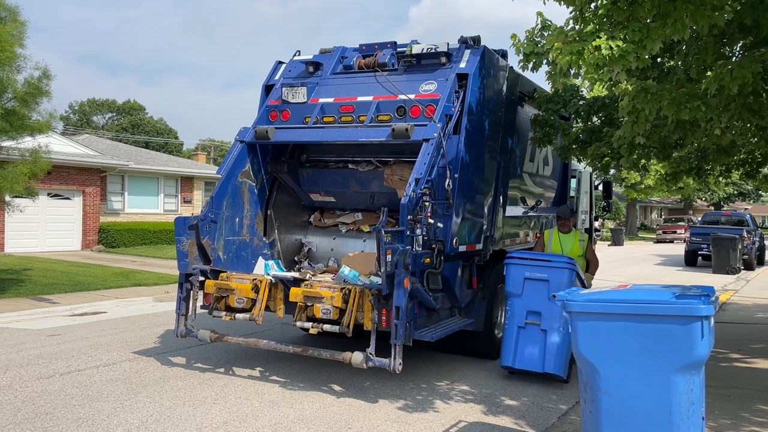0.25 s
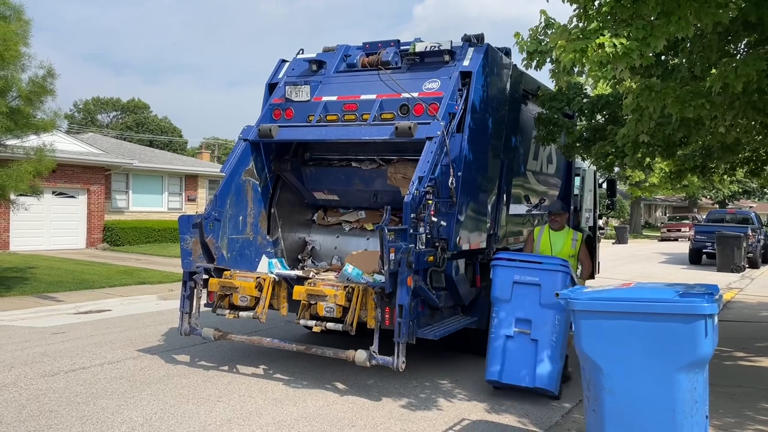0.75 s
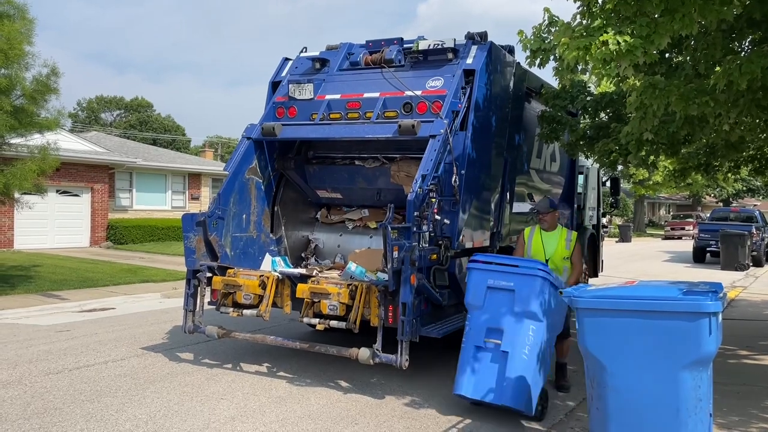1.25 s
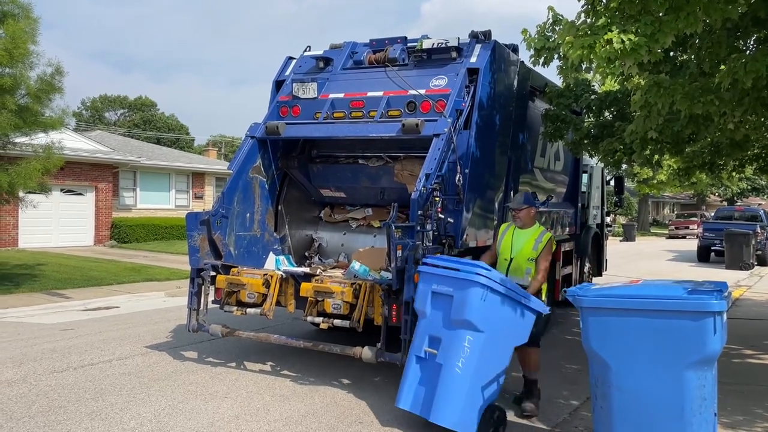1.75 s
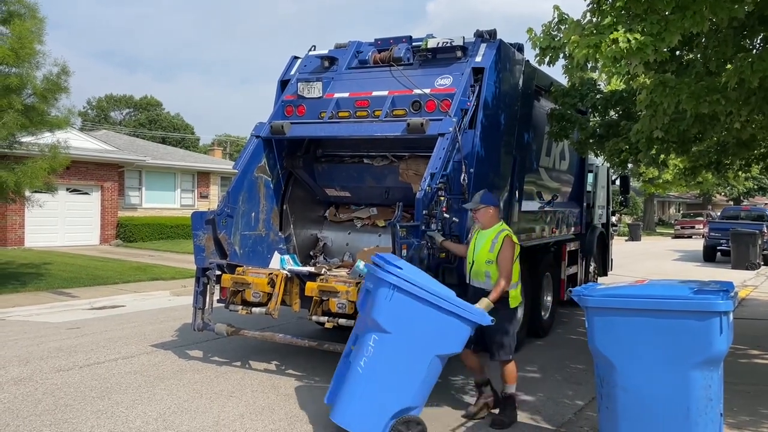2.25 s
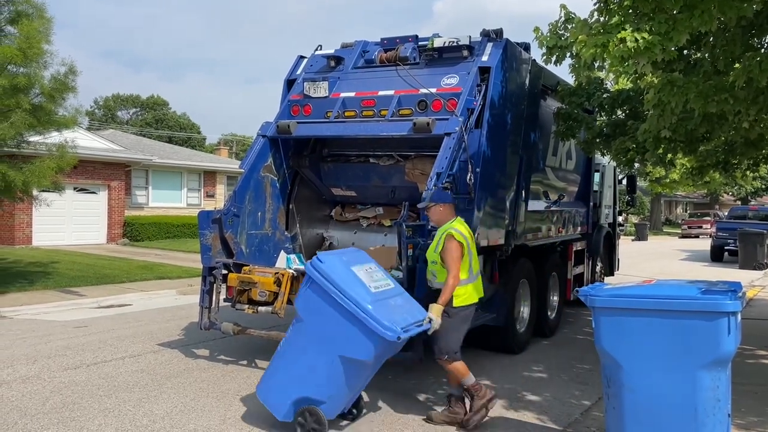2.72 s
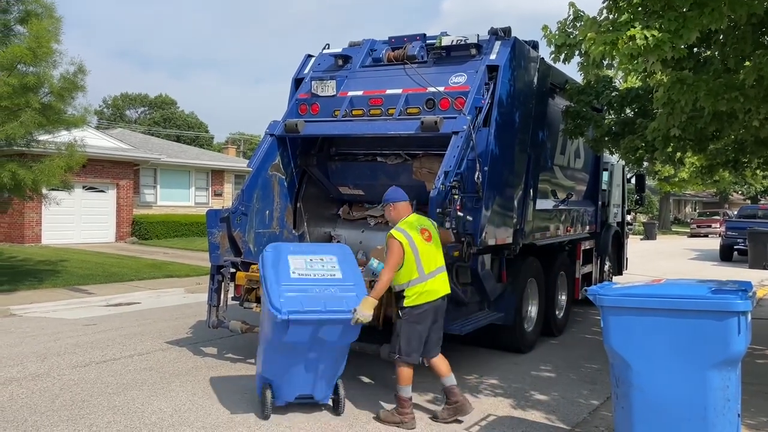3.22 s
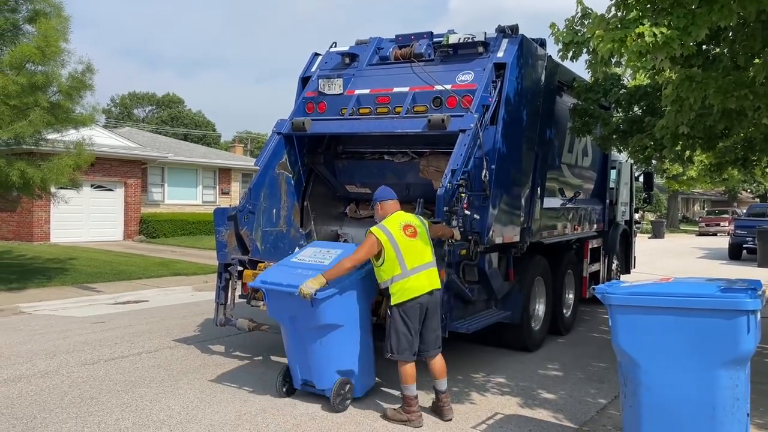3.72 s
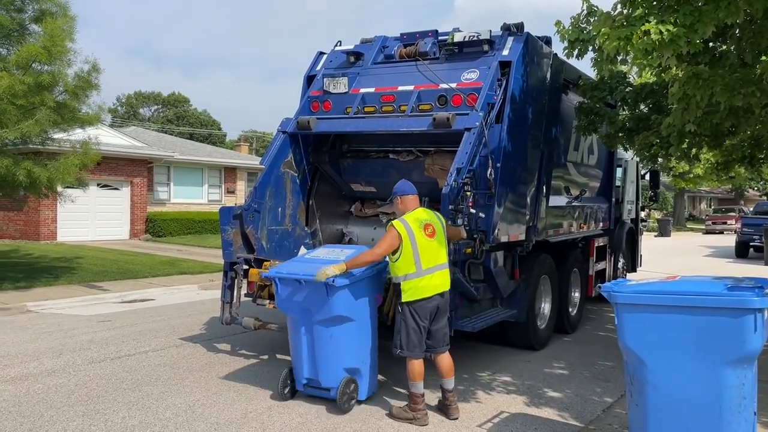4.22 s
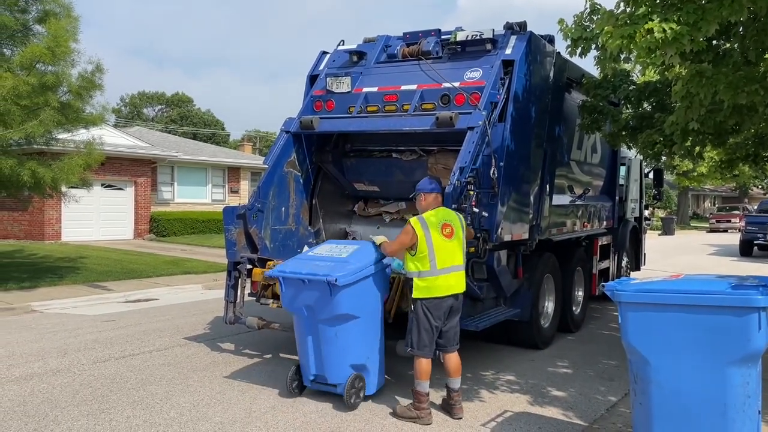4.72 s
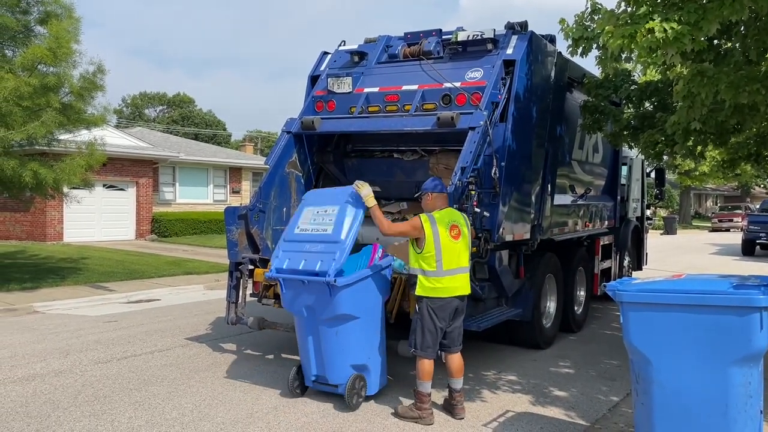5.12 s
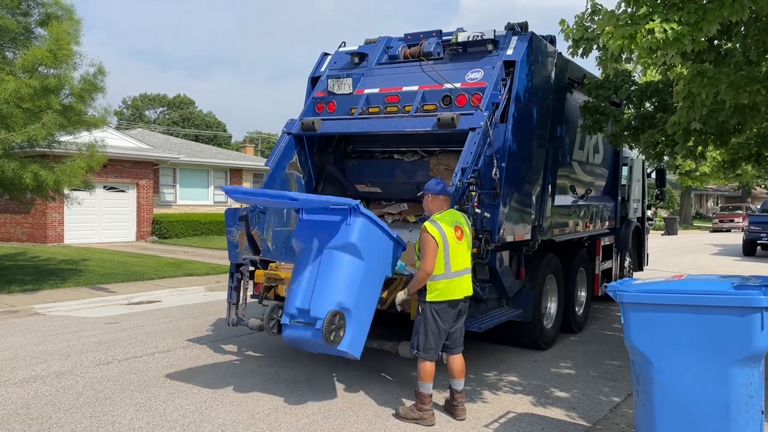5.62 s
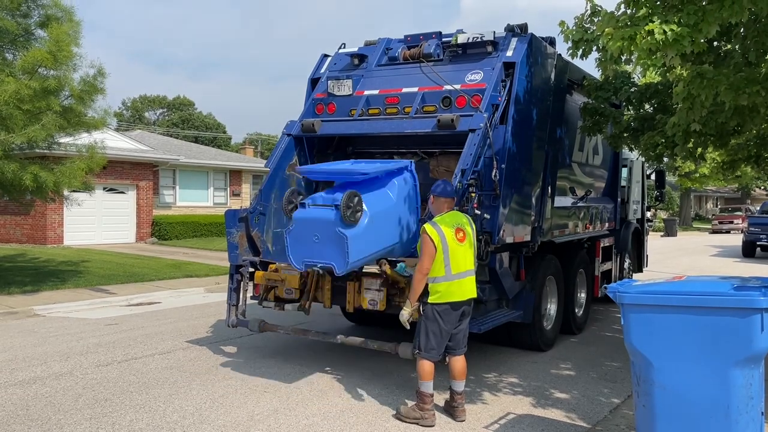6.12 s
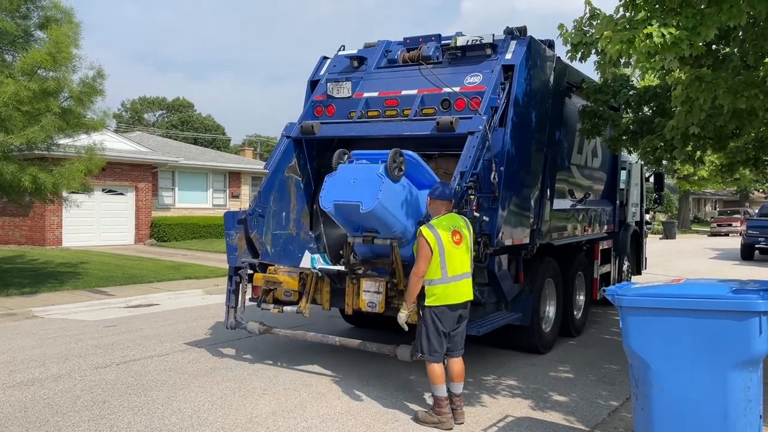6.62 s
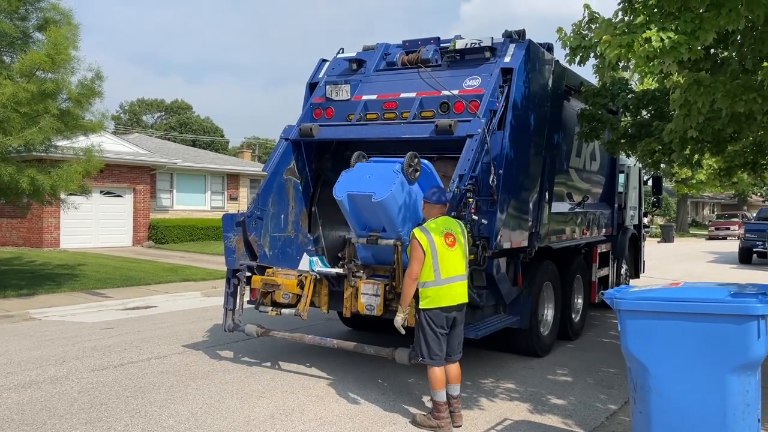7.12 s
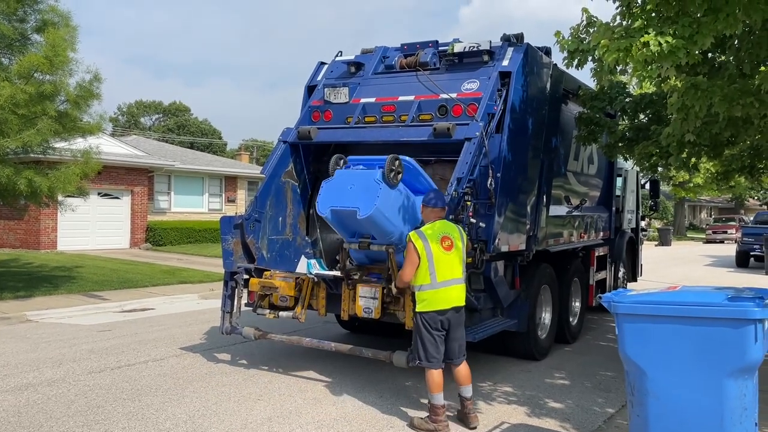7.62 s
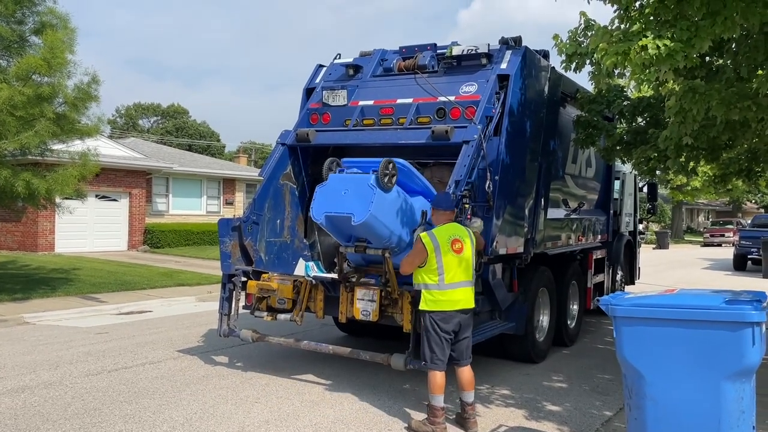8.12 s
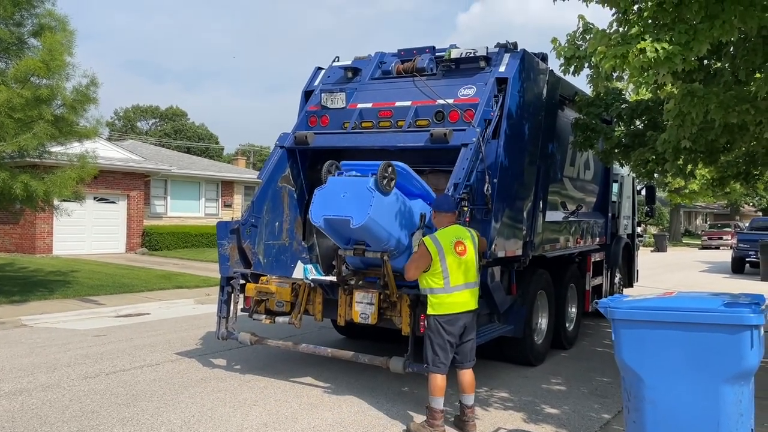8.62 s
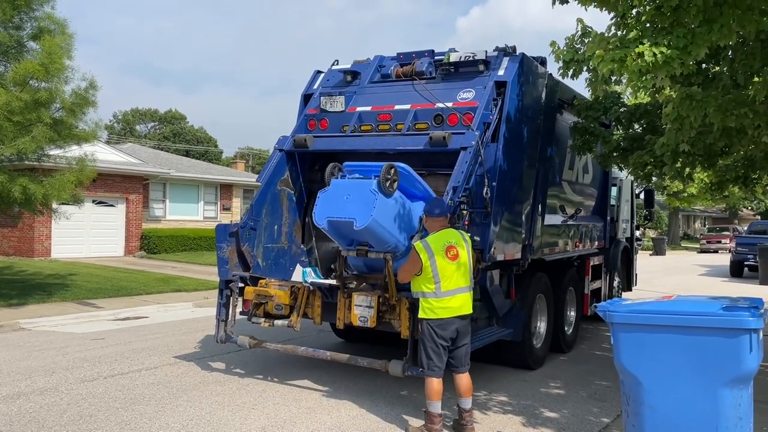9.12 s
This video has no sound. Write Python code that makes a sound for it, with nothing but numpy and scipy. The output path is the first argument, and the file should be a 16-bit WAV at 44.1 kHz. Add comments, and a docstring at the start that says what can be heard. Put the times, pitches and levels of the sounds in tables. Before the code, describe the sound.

Hollow cart bumps and latch clinks over a steady truck engine, then a hard steel bang, hissing hydraulics, tumbling rubbish and repeated shaking crashes.

```python
"""A hollow plastic cart is wheeled up to a rear-loading garbage truck, hooked on, tipped and shaken.
It bangs on the steel: noise bursts for the contacts, decaying sines for panel, cart and hopper.
Rubbish tumbles out as gritty noise, and oil hisses and whistles through the valve as shaped noise.
The diesel, a stack of sines on its firing rate, drones on and sags under the pump's load.
Noise and tiny impacts make the rumble; sparse echoes place the blows in a quiet street."""
import sys
import numpy as np
from scipy import signal
from scipy.fft import rfft, irfft, next_fast_len
from scipy.io import wavfile
from scipy.ndimage import uniform_filter1d, map_coordinates

SR = 44100
rng = np.random.default_rng(int(sys.argv[2]) if len(sys.argv) > 2 else 0)


def persist_wave(psi):
    """Save psi, clipped to +-1, as 16-bit WAV."""
    counts = np.round(np.clip(psi, -1, 1) * 32767).astype(np.int16)
    wavfile.write(sys.argv[1], SR, np.atleast_2d(counts).T)


N = 412776
TIME = np.arange(N) / SR
REV_UP_S = (3.9, 4.5)  # the engine rises to fast idle between these times

# Colour of the jarred hollow cart. Each row: frequency in Hz, relative level in dB.
BODY = [(100, -3.5), (170, -3), (250, 4), (310, 1), (370, 1.5), (460, -2), (560, -11.5), (900, -41.5)]
# Colour of rattling sheet steel and hard contacts. Each row: frequency in Hz, relative level in dB.
RATTLE = [(350, -11), (580, -9), (720, 2), (870, 5.5), (1060, 9), (1220, 1), (1370, -12.5), (1600, -1.5),
          (2000, -7.5), (3000, -13.5), (6000, -35)]
# The hollow cart's wall modes. Each row: frequency in Hz, relative level in dB, t60 in seconds.
CART = [(216, 3, 0.16), (256, -4, 0.068), (293, 3, 0.11), (344, 5.5, 0.1), (400, 5, 0.077),
        (451.6, -7, 0.18), (635, -4.5, 0.12)]


def amp(db):
    """Decibels to gain."""
    return 10 ** (np.asarray(db) / 20)


def unit(x):
    """Scales to rms 1."""
    return x / np.sqrt(np.mean(x ** 2) + 1e-20)


def read(points, hz):
    """A curve's values, interpolated on a log-frequency axis."""
    f, value = np.transpose(points)
    return np.interp(np.log(hz + 1), np.log(f + 1), value)


def colour(x, spectrum):
    """Filters x by a spectrum in dB."""
    size = next_fast_len(x.shape[-1])
    gain = amp(read(spectrum, np.fft.rfftfreq(size, 1 / SR)))
    return irfft(rfft(x, size) * gain, size)[..., :x.shape[-1]]


def brighten(x, treble_db):
    """Tilts the treble from 5 kHz up, by the full amount from 10 kHz."""
    return colour(x, [(5000, 0), (10000, treble_db)])


def wander(hz):
    """A random curve of rms 1 that heads for a new value hz times a second."""
    knots = rng.standard_normal(4000)
    return unit(map_coordinates(knots, [TIME * hz], order=1, mode="wrap"))


def held(start, end, rise, t60):
    """An envelope that rises, holds until the end and dies away."""
    attack = np.clip((TIME - start) / max(rise, .005), 0, 1)
    return attack * amp(-60 * np.maximum(TIME - end, 0) / max(t60, .02))


def add(mix, s, sound):
    """Mixes a sound in at time s."""
    part = mix[max(round(s * SR), 0):][:len(sound)]
    part += sound[:len(part)]


def wide(drive, spectrum):
    """Colours two drives: one reaches both ports alike, the other in opposite sign as the diffuse part."""
    # Each row: frequency in Hz, level of the diffuse part in dB.
    apart = [(50, -21), (250, -12), (1000, -7.5), (3000, -5), (6000, 1), (9000, -41)]
    direct, diffuse = colour(drive, spectrum)
    return unit(direct + np.array([[1], [-1]]) * colour(diffuse, apart))


def grains(per_s, spread_db):
    """Two trains of tiny impacts of very unequal size."""
    size = amp(spread_db * np.minimum(rng.exponential(1, (2, N)), 4))
    struck = rng.random((2, N)) < per_s / SR
    return unit(size * rng.standard_normal((2, N)) * struck)


def burst(spectrum, t, rise, t60, grit_db=0):
    """Coloured noise for dense resonances struck together; grit roughens it into unequal contacts."""
    grit_per_s = 317
    shape = np.minimum(t / max(rise, 1e-4), 1) * amp(-60 * np.maximum(t - rise, 0) / max(t60, .005))
    knots = rng.standard_normal(size=400)
    grit = amp(grit_db * map_coordinates(knots, [t * grit_per_s], order=1, mode="wrap"))
    sound = colour(rng.standard_normal(len(t)), spectrum) * shape * grit
    return unit(sound) * np.sqrt(np.mean(shape ** 2))


def ring(modes, t, detune):
    """Separate decaying modes, a little different in pitch for each point of impact."""
    return sum(amp(db - 60 * t / t60) * np.sin(2 * np.pi * hz * (1 + detune * rng.standard_normal()) * t)
               for hz, db, t60 in modes)


def steelwork(x, ring_db=-4, t60=0.061):
    """Passes x through the many close resonances of pipes and plates."""
    t = np.arange(SR // 8) / SR
    mode_hz = np.exp(rng.uniform(np.log(1500), np.log(15000), size=70))
    response = ring([(hz, 0, t60) for hz in mode_hz], t, detune=0)
    response = response[None] / np.linalg.norm(response)
    return x + amp(ring_db) * signal.oaconvolve(x, response, axes=1)[:, :N]


def turbulent(x):
    """Narrow patches of the spectrum swell and fade at random, so the colour keeps shifting."""
    depth_db = 2.8
    z = signal.stft(x, nperseg=1024)[2]
    patches = uniform_filter1d(rng.standard_normal(z.shape[1:]), size=5, axis=0)  # across frequency
    patches = unit(uniform_filter1d(patches, size=7, axis=1))  # along time
    return unit(signal.istft(z * amp(depth_db * patches), nperseg=1024)[1][:, :N])


def street(x):
    """Scattered reflections from the truck, the trees and the house fronts: sparse taps, one set per port."""
    # How long the echoes last. Each row: frequency in Hz, t60 in seconds.
    decay = [(60, 0.15), (500, 0.33), (2000, 0.19), (6000, 0.2), (10000, 0.062), (16000, 0.094)]
    taps = rng.standard_normal((2, SR // 2)) * (rng.random((2, SR // 2)) < .06)
    taps[:, :SR // 300] = 0  # the first reflections arrive after a short gap
    hz, t, z = signal.stft(taps, SR, nperseg=256)
    tail = signal.istft(z * amp(-60 * t / read(decay, hz)[:, None]), SR, nperseg=256)[1]
    return signal.fftconvolve(x[None], tail / np.linalg.norm(tail[0]), axes=1)[:, :N]


def sag():
    """Firings a second lost to the pump's load."""
    # Each row: start in seconds, end in seconds, firings a second lost, time to sink in seconds.
    loads = [(3.947, 4.454, 6.54, 0.33), (5.329, 5.826, 7.8, .22), (5.58, 6.662, 4.9, 0.43),
             (7.371, 7.731, 9, .3), (8.3, 9.36, 2.38, 0.31)]
    return np.max([hz * held(start, end, sink, t60=.55) for start, end, hz, sink in loads], axis=0)


def engine_speed():
    """Firings a second: the governed speed, less the sag under each load."""
    idle_hz, fast_idle_hz = 62.73, 65.95
    return np.interp(TIME, REV_UP_S, [idle_hz, fast_idle_hz]) - sag()


def diesel(clatter_db=-43, throb=0.072, lope=0.011, drone_db=-1.24):
    """Exhaust drone on multiples of the firing rate, and injector clatter that pulses in step with it."""
    # The exhaust pipe favours other multiples at each speed.
    # Each row: firings a second, then levels of the 2nd, 4th and 6th multiple in dB before the drone's trim.
    pipe = [(57.7, -34, -32, -48), (60.3, -31, -45, -43), (62.6, -31.3, -43, -38),
            (65.4, -39.5, -32.5, -45)]
    # Multiples that the pump's load brings out. Each row: multiple, level at full load in dB.
    load_tones = [(6, -37.5), (8, -45), (10, -55)]
    # Colour of the injectors. Each row: frequency in Hz, relative level in dB.
    injector_colour = [(600, -80), (1000, 0), (1350, -4.5), (1700, -1), (2600, 0), (3500, -6.5),
                       (4500, -12), (7000, -20), (10000, -26), (14000, -45), (16000, -66)]
    waver_db, waver_share, full_load_hz = 3, .005, 7.3  # level, share of the pitch, firings a second lost

    speed = engine_speed()
    dip_db = -6 * held(3.07, 3.6, rise=0.17, t60=0.77)  # the drone dips briefly
    unsteady = np.interp(TIME, REV_UP_S, [.5, 1])  # steadier at low idle
    firing = speed * (1 + waver_share * unsteady * wander(15))
    turns = np.cumsum(firing) / SR  # firings so far
    speeds, *levels = np.transpose(pipe)
    drone = 0
    for k, level in enumerate(levels):
        tone_db = np.interp(speed, speeds, level) + waver_db * unsteady * wander(13)
        drone = drone + amp(tone_db) * np.sqrt(2) * np.sin(4 * np.pi * (k + 1) * turns)

    # the load also makes the exhaust uneven
    strain = np.clip(sag() / full_load_hz, 0, 1)
    whine = sum(amp(db + waver_db * wander(9.3)) * np.sqrt(2) * np.sin(2 * np.pi * k * turns)
                for k, db in load_tones)
    uneven = 1 + .36 * strain * wander(40)
    exhaust = (amp(drone_db + dip_db) * drone + strain * whine) * uneven

    # throbs at twice the firing rate, lopes at a sixth of it
    gate = 1 + throb * np.cos(4 * np.pi * turns) + lope * np.cos(2 * np.pi * turns / 6)
    injectors = steelwork(rng.standard_normal((2, N)) * gate, ring_db=-13)
    return exhaust + amp(clatter_db) * wide(injectors, injector_colour)


def shaking():
    """Gains of boom, body and rattle: the engine's steady share plus every movement of the cart."""
    # The cart rolls, swings or spills its load. Each row: start in seconds, end in seconds,
    # rattle in dB, boom of the chassis in dB, both before the rumble's trims.
    movements = [(0.59, 1.456, -49, -29), (2.742, 3.067, -34, -36), (3.578, 4.438, -33, -32),
                 (4.588, 4.893, -38.5, -46), (5.744, 6.72, -32.5, -50), (6.754, 7.127, -29, -25),
                 (7.242, 7.64, -29, -30), (7.71, 7.947, -32, -46), (8.048, 8.305, -39, -49),
                 (8.446, 8.805, -28.5, -27), (8.906, 9.356, -30, -30)]
    idle_boom_db, idle_body_db, idle_rattle_db = -30, -37, -38  # the running engine alone
    body_over_rattle_db = 2.5
    rattle, boom = np.zeros(N), np.zeros(N)
    for start, end, rattle_db, boom_db in movements:
        shape = held(start, end, rise=0.071, t60=1)
        rattle = np.maximum(rattle, amp(rattle_db) * shape)
        boom = np.maximum(boom, amp(boom_db) * shape)
    return (np.hypot(amp(idle_boom_db), boom),
            np.hypot(amp(idle_body_db), amp(body_over_rattle_db) * rattle),
            np.hypot(amp(idle_rattle_db), rattle))


def rumble(boom_db=1.5, body_db=.5, rattle_db=-2.5, jolt_db=2.24, throb_db=2.0):
    """Many small jolts shake the chassis, the hollow cart and the sheet steel; the moving load taps coarsely."""
    # Colour of the chassis. Each row: frequency in Hz, relative level in dB.
    chassis = [(15, -47), (28, -17), (42, 3.5), (55, 6), (75, 9.5), (100, 0.5), (150, -3), (200, -8),
               (330, -52.5)]
    boom, body, rattle = shaking()
    moving = np.interp(TIME, [2.5, 3, 5.8, 6], [.2, .5, .5, .75])  # share of coarse taps
    jolts = jolt_db * moving * wander(35)
    fine = np.sqrt(1 - moving ** 2) * grains(per_s=3000, spread_db=1.5)
    coarse = moving * grains(per_s=900, spread_db=1.2)
    throbbing = boom * amp(boom_db + throb_db * wander(9))
    return (throbbing * wide(rng.standard_normal((2, N)), chassis)
            + body * amp(body_db + jolts) * wide(grains(per_s=1800, spread_db=2.0), BODY)
            + rattle * amp(rattle_db + jolts) * wide(fine + coarse, RATTLE))


def oil_flow():
    """Gain of the hiss: each stroke opens quickly, builds pressure and bleeds off."""
    # Oil is let through to the rams.
    # Each row: start in seconds, end in seconds, level at the end in dB before the oil's trim.
    strokes = [(2.717, 2.963, -38.5), (3.96, 4.434, -39), (5.264, 5.828, -36), (6.01, 6.686, -34.5),
               (6.784, 7.058, -38.5), (7.346, 7.91, -40), (8.346, 8.95, -39.5), (8.978, 9.267, -32)]
    pressure_db_per_s = 7  # the hiss grows through a stroke
    return np.max([held(start, end, rise=0.074, t60=0.96)
                   * amp(db + pressure_db_per_s * np.minimum(TIME - end, 0))
                   for start, end, db in strokes], axis=0)


def valve_jet(bend=.02, drift=.006, lower=0.91, lower_db=-5, waver_db=3.0):
    """Oil rushes through the valve, with two breathy whistles that climb as it opens and sink as it shuts."""
    # The valve sings at full flow. Each row: start in seconds, end in seconds, time to open in seconds,
    # rush in dB, whistle in dB, whistle in Hz when wide open.
    jets = [(4.12, 4.35, 0.095, -42.5, -54, 14900), (5.41, 5.69, 0.22, -39.5, -54, 15120),
            (5.99, 6.628, 0.17, -42, -41.5, 15200), (6.87, 6.972, 0.044, -45, -56, 16000),
            (9, 9.212, 0.077, -42, -39, 15500)]
    # Colour of the rush. Each row: frequency in Hz, relative level in dB.
    rush_colour = [(7000, -69), (10000, 6), (12500, 3), (14200, 10.5), (15200, 6), (15900, -20),
                   (16500, -30)]
    openings = np.array([held(start, end, rise, t60=0.22) for start, end, rise, *_ in jets])
    opening = openings.max(axis=0)
    rush_db, whistle_db, top_hz = np.array(jets)[openings.argmax(axis=0), 3:].T
    out = amp(rush_db) * turbulent(wide(rng.standard_normal((2, N)), rush_colour))
    for ratio, db in ((1, 0), (lower, lower_db)):
        hz = ratio * top_hz * (1 - bend * (1 - opening) + drift * wander(11))
        # slow noise spreads the sine into a narrow, breathy band
        fuzz = unit(colour(rng.standard_normal(N), [(180, 0), (400, -8), (900, -26), (2000, -80)]))
        gain = amp(whistle_db + db + waver_db * wander(16))
        out = out + gain * fuzz * np.sqrt(2) * np.sin(2 * np.pi * np.cumsum(hz) / SR)
    return opening * out


def hydraulics(oil_db=2, flutter_db=1.5):
    """Oil hisses through the pipes as fluttering noise and sings in the valve."""
    # Colour of the hiss. Each row: frequency in Hz, relative level in dB.
    hiss_colour = [(1000, 9), (2500, 7), (3900, 10.5), (5200, 2.5), (6500, 5), (8500, 1.5), (11000, -3),
                   (13000, -5.5), (15000, -30), (16200, -24)]
    flow = oil_flow() * amp(oil_db + flutter_db * wander(60))
    oil = steelwork(grains(per_s=9000, spread_db=1.5))
    return flow * turbulent(wide(oil, hiss_colour)) + valve_jet()


def crashes_and_spurts():
    """Short noise bursts: bright metal crashes, scrapes of the cart and spurts of the valve."""
    # Colour of the bursts. Each row: frequency in Hz, relative level in dB.
    burst_colour = [(500, 7.5), (1500, 2.5), (2800, 7), (4500, 4), (7200, 2), (9000, -0.5), (11000, 0.5),
                    (13000, -4), (14500, -1), (16000, -30)]
    # Each row: start in seconds, level in dB, rise in seconds, t60 in seconds, extra dB above 10 kHz.
    bursts = [(2.157, -34, .004, 0.21, -20), (2.85, -35.5, 0.032, 0.13, -3), (2.90, -31.5, 0.038, 0.13, 4),
              (3.78, -33, 0.015, 0.2, -5), (6.494, -25, 0.011, 0.42, -0.5), (6.907, -32, 0.0097, 0.6, 2.5),
              (7.315, -22, 0.01, 0.15, -3), (8.242, -32.5, 0.0046, 0.12, -17),
              (8.321, -12.5, 0.005, 0.15, 5), (8.626, -12.5, 0.01, 0.15, 1.5),
              (8.721, -28.5, 0.041, 0.25, -10)]
    out, t = np.zeros(N), np.arange(SR // 2) / SR
    for s, db, rise, t60, treble_db in bursts:
        add(out, s, amp(db) * brighten(burst(burst_colour, t, rise, t60), treble_db))
    return out


def rubbish(clatter_db=-7, t60=0.076):
    """Loose pieces tumble into the hopper, each a short, gritty rattle with its own hollow colour."""
    spill_s = 5.85  # the cart tips past level and its load starts to slide
    size_spread_db = 5  # between the smallest and largest pieces
    out, t = np.zeros(N), np.arange(SR // 8) / SR
    for when, pitch, size in rng.random((45, 3)):
        hz = 600 * 2.8 ** pitch
        piece = [(hz / 3, -22), (hz / 1.3, -8), (hz, 0), (hz * 1.3, -9),
                 (hz * 1.8, -7), (hz * 3, -20), (hz * 8, -45)]
        sound = burst(piece, t, rise=0.0063, t60=t60, grit_db=5.5)
        add(out, spill_s + when * (TIME[-1] - spill_s), amp(size_spread_db * size) * sound)
    return shaking()[2] * amp(clatter_db) * out  # follows the rattle of the moving cart


def squeaks():
    """Dry wheels and pivots stick and slip, singing raggedly for a moment on an unsteady pitch."""
    # Squeaks and groans of the cart's wheels and the tipper's pivots. Each row: start in seconds,
    # length in seconds, pitch at the start in Hz, pitch at the end in Hz, level in dB.
    cries = [(2.789, 0.039, 4740, 4780, -28.5), (3.11, 0.094, 1150, 1220, -34.5),
             (4.01, 0.12, 6340, 6570, -36), (4.073, 0.12, 9500, 9900, -36), (5.238, 0.1, 6500, 6370, -41),
             (6.887, 0.14, 5400, 5460, -32.5), (7.286, 0.106, 4820, 4714, -37),
             (7.716, 0.16, 9150, 8900, -34), (8.98, 0.34, 155, 175, -16), (9.027, .33, 316, 343, -27)]
    scratch, rasp = .005, .5  # unsteadiness of the pitch and of the level, as shares
    out, slip = np.zeros(N), wander(400)
    for s, length, start_hz, end_hz, db in cries:
        hz = np.linspace(start_hz, end_hz, int(max(length, .01) * SR))
        hz = hz * (1 + scratch * slip[int(s * SR):][:len(hz)])
        grip = unit(1 + rasp * wander(min(.15 * start_hz, 250))[:len(hz)])
        tone = np.sin(2 * np.pi * np.cumsum(hz) / SR)
        add(out, s, amp(db) * grip * np.hanning(len(hz)) * tone)
    return out


def clinks(ring_db=-7, clack_db=-3, tail_db=-24, chatter_t60=0.018, clack_t60=0.039, tail_t60=0.4):
    """Latches and axle ends chatter briefly as they meet, and leave a bright shimmer in the steel."""
    # Clinks of latches and loose metal.
    # Each row: start in seconds, level in dB before the parts' trims, extra dB above 10 kHz.
    meetings = [(0.284, -40, 10), (.423, -48, 6), (0.6307, -46, 5), (0.703, -24.5, -4),
                (0.7566, -11.5, 1.5), (0.763, -21, 0), (0.838, -37, 3), (1.44, -30.5, 2.5), (1.587, -34, 6),
                (2.0706, -36, 10.5), (2.528, -38, 11), (4.823, -33, -9), (5.843, -17.5, 8),
                (5.925, -38, 10), (6.6205, -21.5, 11)]
    # A latch's modes. Each row: frequency in Hz, relative level in dB, t60 in seconds.
    latch = [(1925, -15, 0.079), (2700, -25, 0.047), (3220, 7, 0.042), (3760, 4.5, 0.046),
             (4670, -1, 0.046), (5300, -2.5, .06), (6140, -5, 0.077), (6700, -13, 0.065)]
    tick_db, tick_growth = -9, 0.57  # the tick grows more slowly than the ring, in dB per dB
    tick = [(2000, -27), (4500, 11.5), (7000, 3.5), (11000, -5.0), (16000, -10)]
    clack = [(1400, 0), (2400, -6), (2800, 11.0), (3500, -4), (4600, 0.5), (6200, -18), (7500, -2), (16000, -18)]
    shimmer = [(1500, -25), (2700, -13), (6500, 10), (11000, -2), (14000, -11), (16000, -27)]
    out, t = np.zeros(N), np.arange(SR // 3) / SR
    for s, level, treble_db in meetings:
        contacts = rng.standard_normal(len(t)) * amp(-60 * t / chatter_t60)
        contacts = contacts / np.linalg.norm(contacts)
        rung = signal.fftconvolve(contacts, ring(latch, t, detune=0.0065))[:len(t)]
        clink = (amp(level + ring_db) * rung
                 + amp(level + clack_db) * burst(clack, t, rise=0.0055, t60=clack_t60)
                 + amp(level + tail_db) * burst(shimmer, t, rise=.008, t60=tail_t60)
                 + amp(tick_db + tick_growth * level) * burst(tick, t, rise=0.00076, t60=0.011))
        add(out, s, brighten(clink, treble_db))
    return out


def judders(panel_db=0, cart_db=-11):
    """Uneven runs of small slips; each rings a different spot of a panel and stirs the hollow cart."""
    # The cart and its lid stick and slip, or chatter after a blow.
    # Each row: start in seconds, end in seconds, level in dB, pitch of the panel in Hz.
    runs = [(2.16, 2.2, -28, 1390), (2.762, 2.89, -25.5, 894), (2.921, 3.04, -31, 1103),
            (3.763, 3.85, -20, 1093), (4.278, 4.385, -24, 997), (4.829, 4.875, -28.5, 860),
            (5.859, 5.905, -17.5, 805), (6.758, 6.81, -22, 950), (6.983, 7.035, -21, 907),
            (7.615, 7.675, -22, 890), (8.64, 8.7, -18, 851), (9.233, 9.29, -14.5, 905)]
    # A plastic panel's modes. Each row: multiple of its pitch, relative level in dB, t60 in seconds.
    panel_modes = [(.55, -10, .04), (1, -2.5, .045), (1.17, -7, .04), (1.62, -11, 0.051), (2.1, -14, 0.033),
                   (2.8, -13, 0.025)]
    slips_per_s, slip_spread_db, pitch_spread = 90, 3.5, .1
    out, t = np.zeros(N), np.arange(SR // 8) / SR
    for start, end, db, pitch_hz in runs:
        s = start
        while s < end:
            hz = pitch_hz * (1 + pitch_spread * rng.standard_normal())
            panel = [(hz * k, level, t60) for k, level, t60 in panel_modes]
            slip = (amp(panel_db) * ring(panel, t, detune=0.038)
                    + amp(cart_db) * ring(CART, t, detune=.04))
            slip_db = db + slip_spread_db * rng.uniform(-1.37, 1)
            add(out, s, amp(slip_db) * slip * (1 - np.exp(-t / 0.00096)))
            s += rng.uniform(.4, 1.6) / slips_per_s
    return out


def strikes():
    """Every blow by its kind: (s, clack dB, shell dB, thud dB, crack dB, t60 s, panel Hz, wall Hz)."""
    # The plastic cart bumps on the road and the tipper. Each row: start in seconds, shell in dB,
    # thud in dB, frequency in Hz at which the struck wall booms most. All levels here are before trims.
    bumps = [(0.335, -25.5, -21, 302), (.675, -22, -16.5, 252), (1.66, -25, -21.5, 300),
             (2.806, -14.5, -38, 394), (2.87, -24, -40, 400), (2.971, -23.5, -28, 290),
             (3.069, -29, -16.5, 226), (3.645, -29, -20.5, 250), (3.811, -17, -11, 230),
             (4.069, -13.5, -24, 340), (4.111, -15.5, -23, 257), (4.276, -19.5, -26, 340),
             (4.332, -15, -26, 395), (4.353, -11.5, -17, 229), (5.913, -23.5, -31, 345),
             (7.023, -37, -13.5, 251), (7.335, -19.5, -36, 397), (7.45, -22.5, -36, 400),
             (7.649, -22.5, -19, 445.6), (8.344, -13, -17, 410), (8.665, -13.5, -30, 293),
             (9.268, -14.5, -36, 345)]
    # Steel meets steel on the tipper. Each row: start in seconds, clack in dB, thud in dB.
    bangs = [(5.844, -16, -13), (5.851, -7.5, -11), (6.251, -15.5, -19), (6.6198, -10, -33),
             (6.749, -10, -11.5), (6.846, -17.5, -23), (6.986, -21, -19.5), (8.097, -23, -23.5),
             (8.638, -18, -16.5), (9.099, -19.5, -22), (9.204, -18.5, -19), (9.2958, -9.5, -10.5)]
    # Light, dry clacks of the lid and of falling pieces.
    # Each row: start in seconds, clack in dB, pitch of the struck panel in Hz.
    clacks = [(0.675, -32, 880), (1.949, -29, 1215), (2.158, -24, 1827), (2.439, -29, 1200),
              (2.93, -22.5, 1460), (3.802, -16, 1053), (3.814, -22.5, 1080), (3.947, -25, 1054),
              (4.096, -20, 1020), (4.172, -23, 1022), (4.283, -25.5, 1100), (4.824, -21, 1075),
              (4.836, -19, 797), (5.927, -19, 973), (6.053, -28, 1290), (6.283, -22, 1090),
              (6.315, -24.5, 1050), (6.649, -21.5, 973), (7.021, -24, 995), (7.099, -19, 1000),
              (7.452, -24.5, 1066), (7.597, -21, 938), (7.648, -20.5, 893), (7.98, -21, 947),
              (9.123, -27, 950), (9.327, -21.5, 1234)]
    jarred_hz = 362  # where the cart booms most when it is jarred as a whole

    def panel_hz():
        """The note of the cart's wall varies from place to place."""
        return 1009 * (1 + 0.073 * rng.standard_normal())

    for s, db, thud, wall_hz in bumps:
        yield s, db - 10, db, thud, db - 22, 0.092, panel_hz(), wall_hz
    for s, db, thud in bangs:
        # 0.12 s at -30 dB, halved for every 16.5 dB more: hard bangs clamp the parts and die sooner
        t60 = 0.12 * .5 ** ((db + 30.0) / 16.5)
        yield s, db, (db + thud) / 2 - 6.5, thud, db - 5, t60, panel_hz(), jarred_hz
    for s, db, hz in clacks:
        yield s, db, db - 15, db - 4.5, db - 28, 0.098, hz, jarred_hz


def knocks(clack_db=-3, panel_db=0, shell_db=-4, cart_db=1, thud_db=-4, crack_db=2,
           shell_longer=2.14, crack_shorter=0.52, panel_shorter=0.82):
    """Each blow cracks at the contact, rings one panel, booms in the cart and thuds in the hopper."""
    # Colour of the crack. Each row: frequency in Hz, relative level in dB.
    crack_colour = [(900, -32), (1500, 16), (2400, 1), (3500, 6.5), (4800, -6), (6200, -6), (7200, 1.5),
                    (9000, -3), (10800, -5.5), (12500, -9), (14000, -13), (16000, -31)]
    # The steel hopper's deep modes. Each row: frequency in Hz, relative level in dB, t60 in seconds.
    hopper = [(58, -7, 0.49), (63.8, 3, 0.28), (90.4, 7.5, 0.21), (119.5, -2.5, 0.35), (146.8, 3, 0.21)]
    # Arms, pins and lid set ringing by the harder blows.
    # Each row: start in seconds, frequency in Hz, level in dB, t60 in seconds.
    clangs = [(2.156, 1820, -27, 0.093), (2.156, 2730, -29, 0.063), (4.824, 1459, -27, 0.12),
              (4.835, 795, -11, 0.032), (5.839, 620, -8.5, 0.06), (5.846, 458, -4, 0.059),
              (6.252, 477, -11, 0.044), (6.619, 3544, -3.5, 0.012), (6.621, 966, -2.5, 0.03),
              (6.621, 10640, -22, 0.12), (6.748, 1450, -3.5, 0.016), (6.752, 384, -3, 0.056),
              (9.262, 331.4, -12, 0.35), (9.295, 1424, -7, 0.021), (9.296, 1010, -14, 0.044)]
    give = .016  # soft plastic gives way: rise time as a share of the ring time
    focus_db_per_octave = 16  # how much weaker modes ring away from the struck wall's note
    out, t = np.zeros(N), np.arange(SR // 2) / SR
    for s, clack, shell, thud, crack, t60, hz, wall_hz in strikes():
        wall = [(f, db - focus_db_per_octave * abs(np.log2(f / wall_hz)), decay) for f, db, decay in CART]
        # the first two modes are detuned apart at random
        panel = [(hz, 0, t60 * panel_shorter), (hz, -6, t60 * panel_shorter),
                 (hz * 3.0, -10, t60 / 2), (hz * 1.9, -14, t60 / 2)]
        contact = burst(RATTLE, t, rise=t60 * give, t60=t60, grit_db=5.5)
        panel_ring = ring(panel, t, detune=0.017) * (1 - np.exp(-t / 0.0022))
        shell_noise = burst(BODY, t, rise=0.0022, t60=t60 * shell_longer)
        cart_boom = ring(wall, t, detune=0.028) * (1 - np.exp(-t / 0.0044))
        hopper_thud = ring(hopper, t, detune=0.044) * (1 - np.exp(-t / 0.0034))
        crack_noise = burst(crack_colour, t, rise=t60 * give / 2, t60=t60 * crack_shorter)
        add(out, s, amp(clack + clack_db) * contact + amp(clack + panel_db) * panel_ring
            + amp(shell + shell_db) * shell_noise + amp(shell + cart_db) * cart_boom
            + amp(thud + thud_db) * hopper_thud + amp(crack + crack_db) * crack_noise)
    for s, hz, db, t60 in clangs:
        add(out, s, ring([(hz, db, t60)], t, detune=0.002) * (1 - np.exp(-t / 0.00098)))
    return out


def scene(wet_db=-12):
    """The running truck, and the blows with reflections that carry little deep bass or high treble."""
    blows = knocks() + judders() + clinks() + rubbish() + crashes_and_spurts() + squeaks()
    thrown = colour(blows, [(100, -20.0), (600, 1.5), (5000, 2.5), (9000, -16.0)])
    return diesel() + rumble() + hydraulics() + blows + amp(wet_db) * street(thrown)


def record(dry):
    """Two microphone ports differ in phase and level; deep bass is cut, peaks are rounded, treble band-limited."""
    # Each row: frequency in Hz, phase in radians by which the left port leads.
    lead = [(0, 0), (400, 0), (1200, .4), (1900, -.5), (2900, 1), (4400, 1.1), (5250, 1.2), (6500, -.7),
            (7600, -2.3), (8600, -3.14), (9600, -4), (11900, -5.6), (16000, -6.3)]
    # Each row: frequency in Hz, left level over right in dB.
    tilt = [(60, -2), (250, -2.1), (550, -0.1), (1100, 1.1), (2000, 0), (4000, -0.1), (9000, -0.5)]
    ceiling, edge_hz = .92, 16200
    size = next_fast_len(N + 2048)
    hz = np.fft.rfftfreq(size, 1 / SR)
    # each port takes half of the difference
    half = amp(read(tilt, hz) / 2) * np.exp(.5j * np.interp(hz, *np.transpose(lead)))
    ports = irfft(rfft(dry, size) * np.array([half, 1 / half]), size)[:, :N]
    ports = signal.sosfilt(signal.butter(3, 33, "high", fs=SR, output="sos"), ports)
    rounded = ports / (1 + (ports / ceiling) ** 6) ** (1 / 6)
    band_limit = signal.firwin(511, edge_hz, window=("kaiser", 9), fs=SR)
    return signal.oaconvolve(rounded, band_limit[None], "same")


dry = scene()
out = record(dry)
persist_wave(out)
```